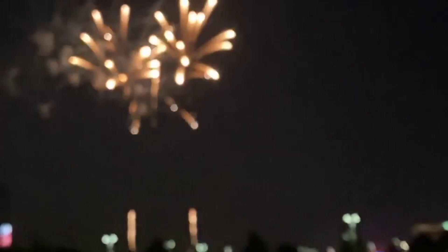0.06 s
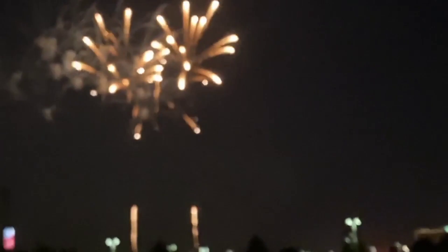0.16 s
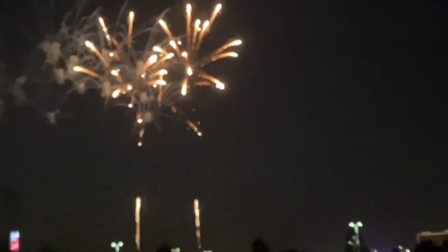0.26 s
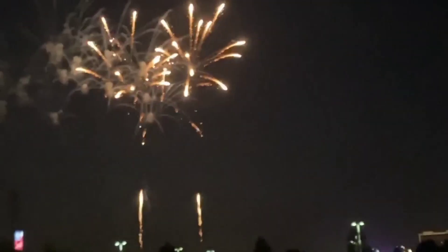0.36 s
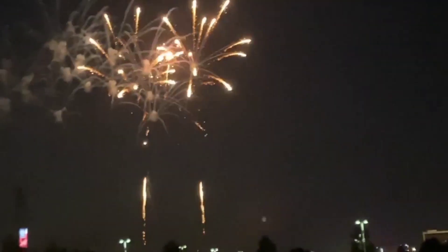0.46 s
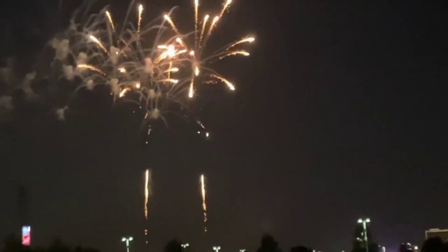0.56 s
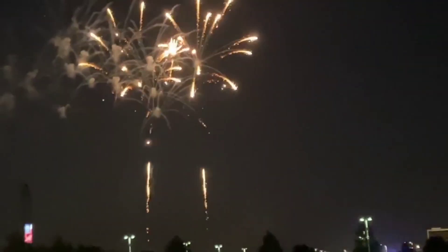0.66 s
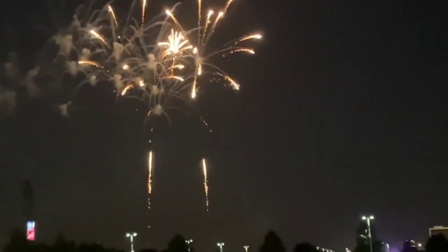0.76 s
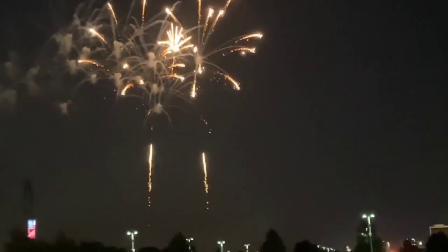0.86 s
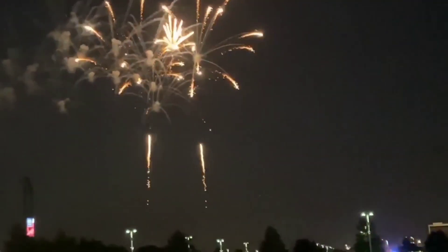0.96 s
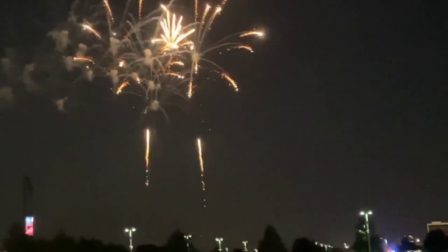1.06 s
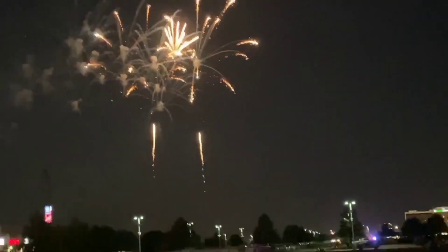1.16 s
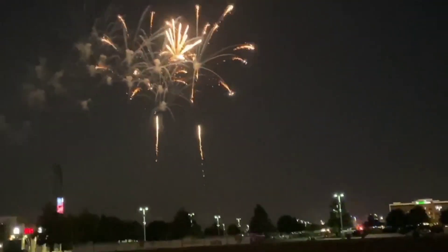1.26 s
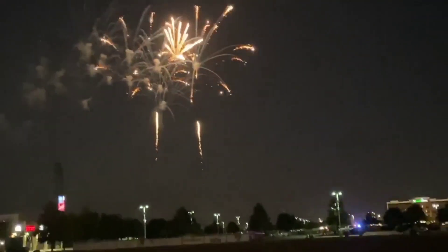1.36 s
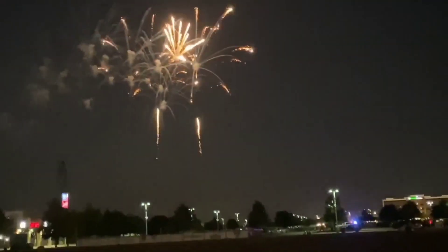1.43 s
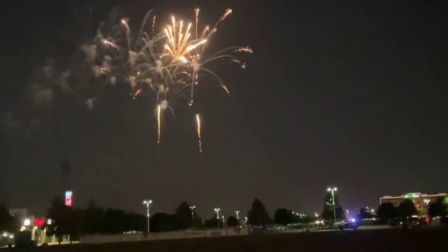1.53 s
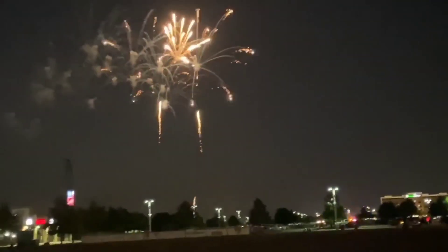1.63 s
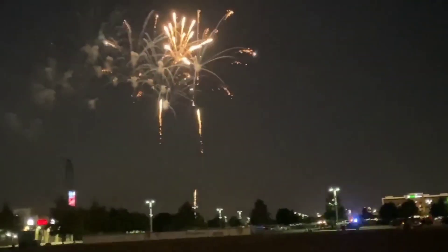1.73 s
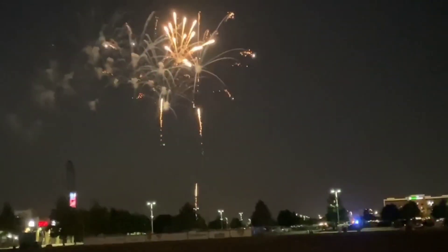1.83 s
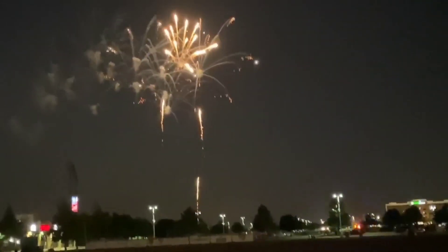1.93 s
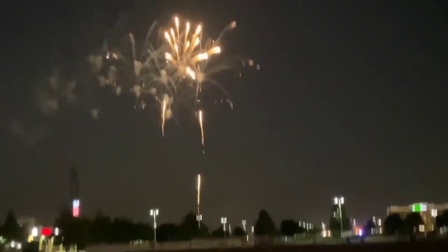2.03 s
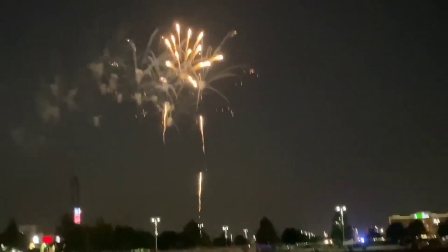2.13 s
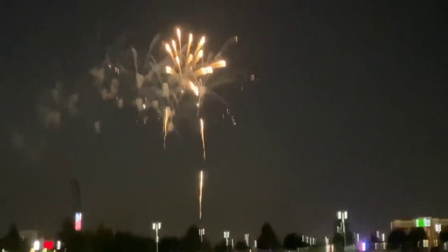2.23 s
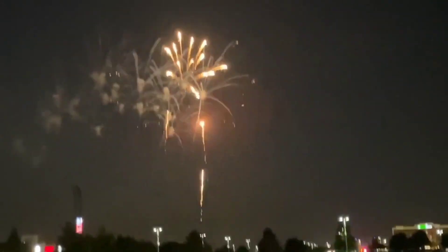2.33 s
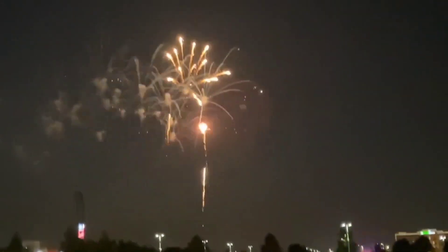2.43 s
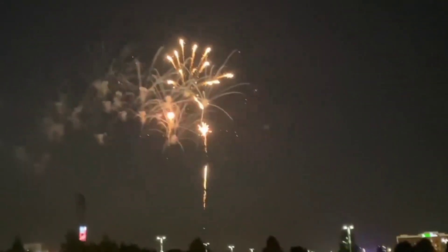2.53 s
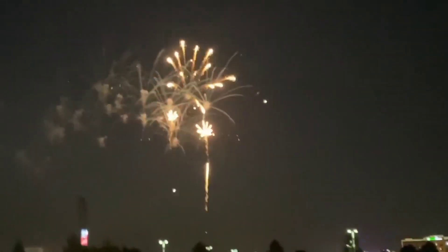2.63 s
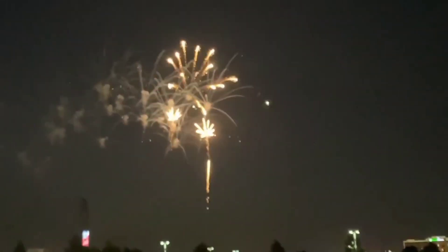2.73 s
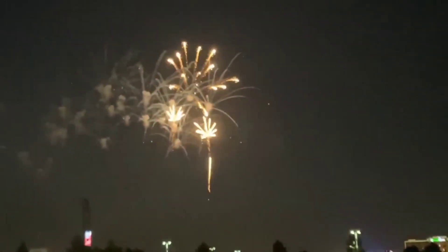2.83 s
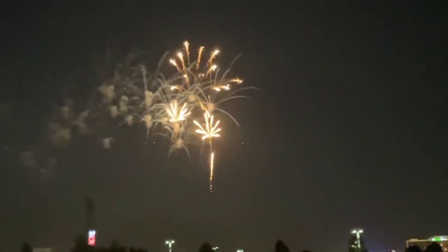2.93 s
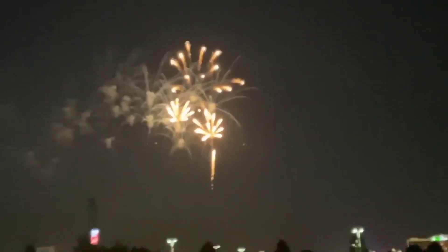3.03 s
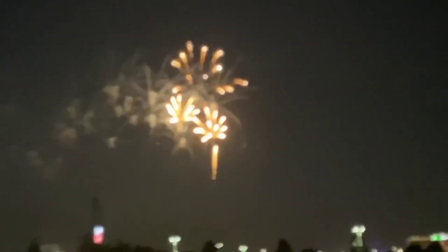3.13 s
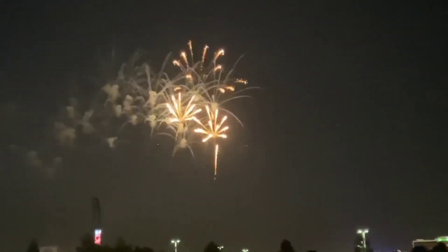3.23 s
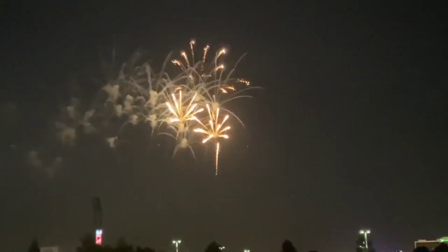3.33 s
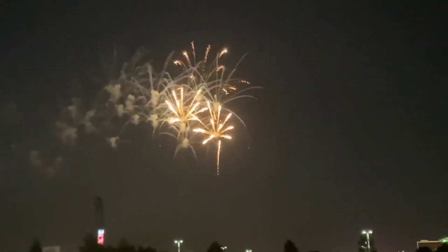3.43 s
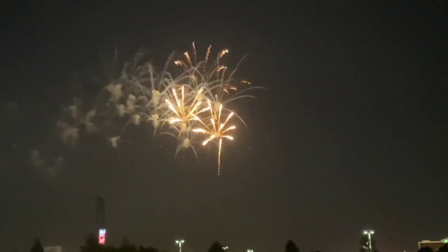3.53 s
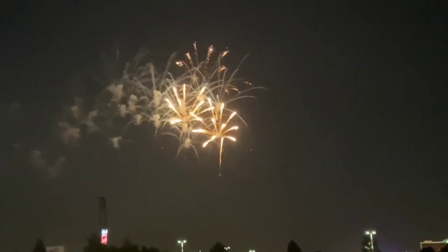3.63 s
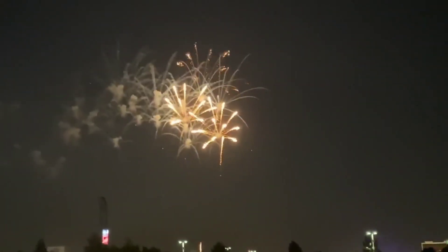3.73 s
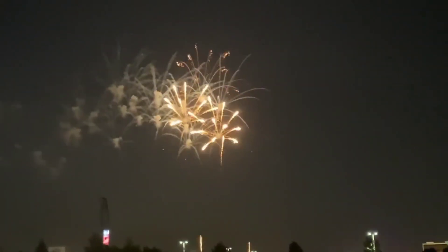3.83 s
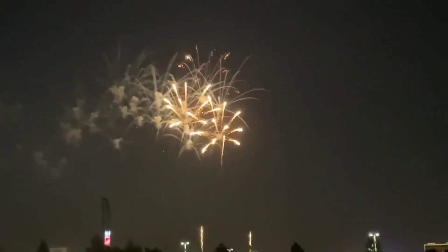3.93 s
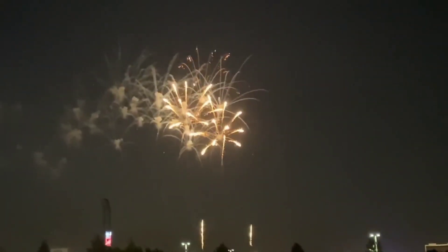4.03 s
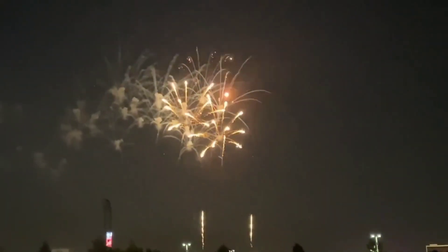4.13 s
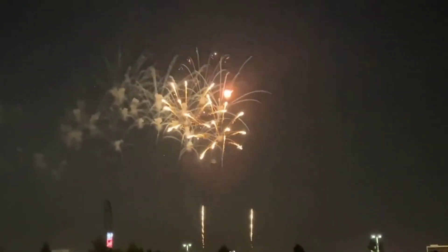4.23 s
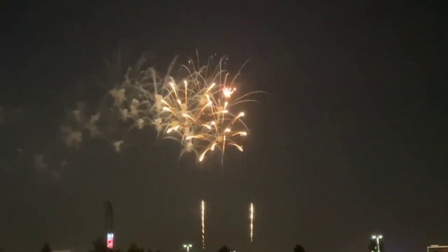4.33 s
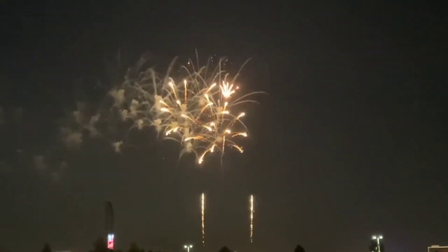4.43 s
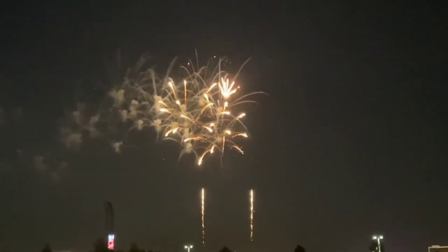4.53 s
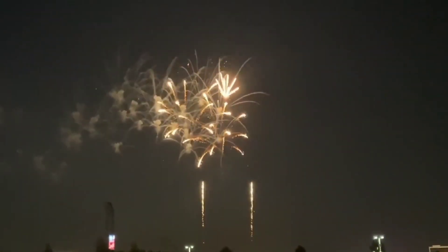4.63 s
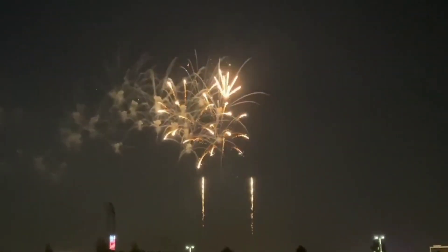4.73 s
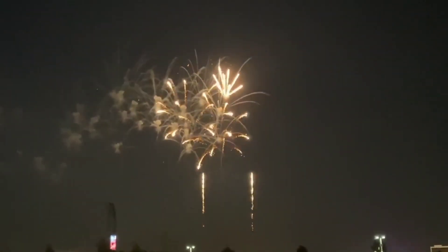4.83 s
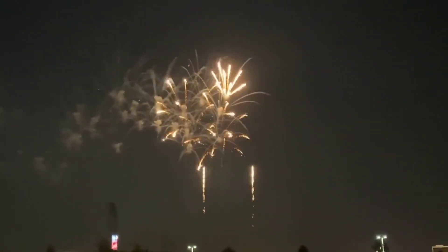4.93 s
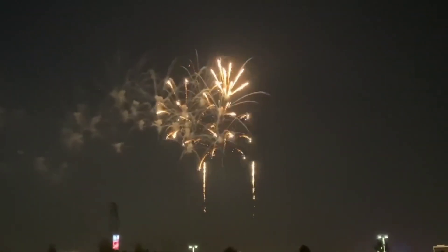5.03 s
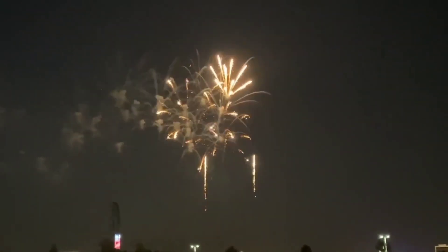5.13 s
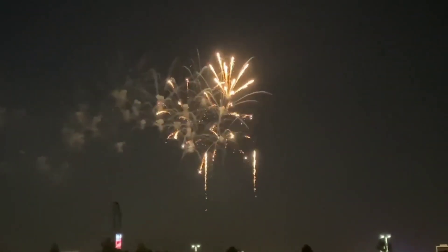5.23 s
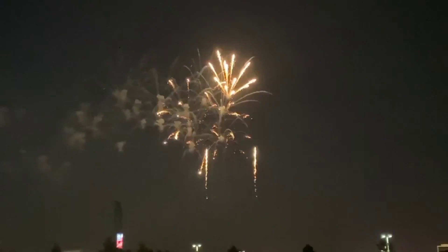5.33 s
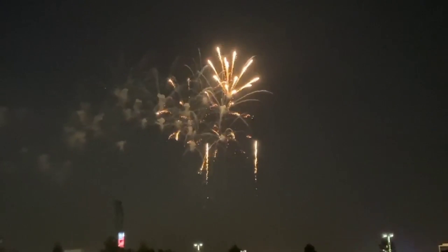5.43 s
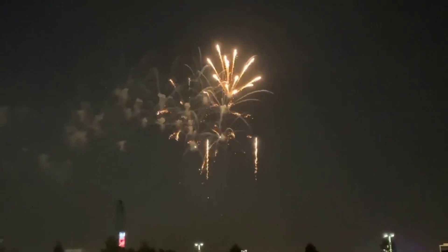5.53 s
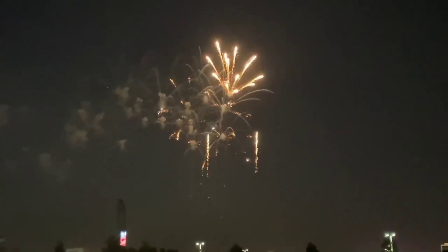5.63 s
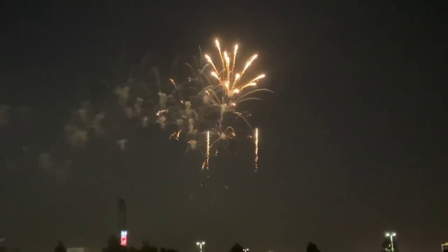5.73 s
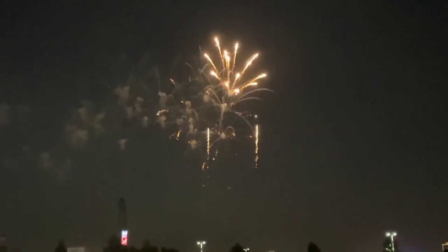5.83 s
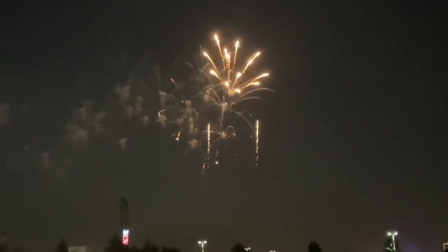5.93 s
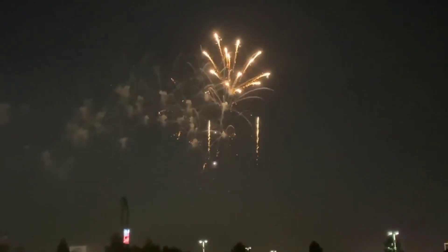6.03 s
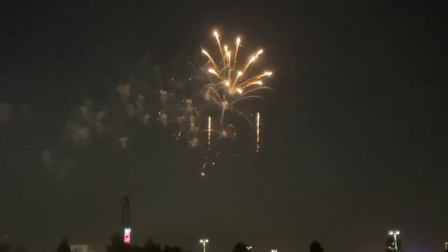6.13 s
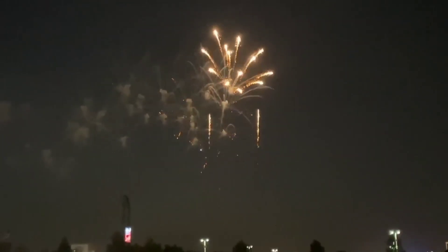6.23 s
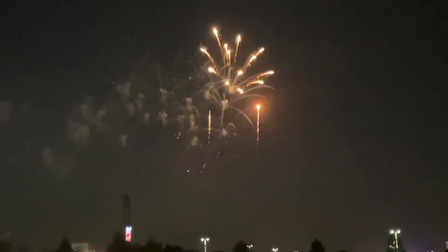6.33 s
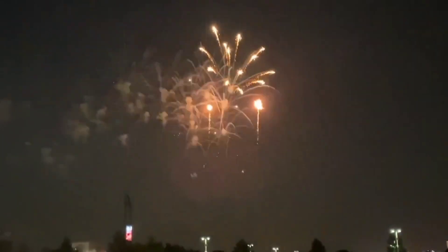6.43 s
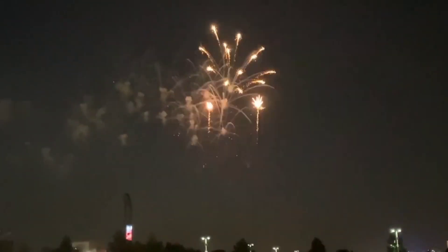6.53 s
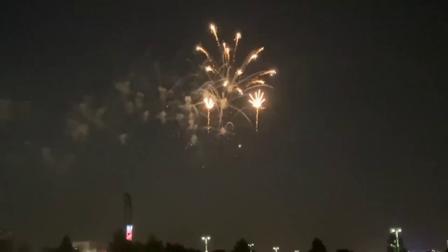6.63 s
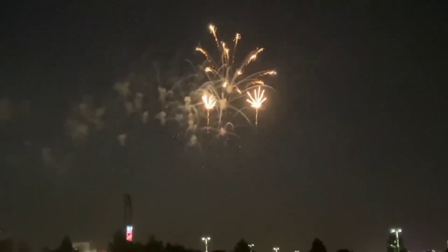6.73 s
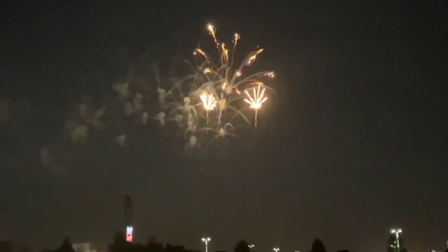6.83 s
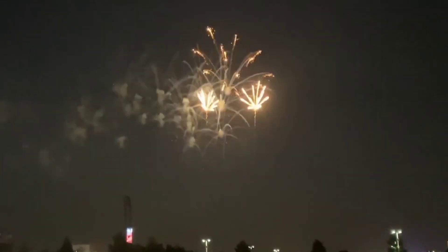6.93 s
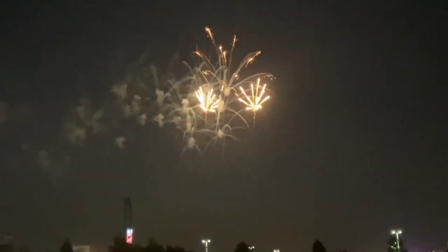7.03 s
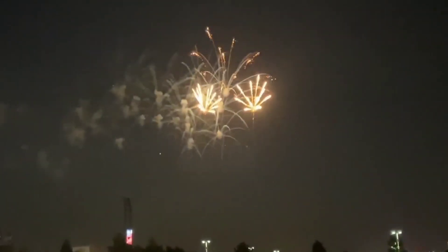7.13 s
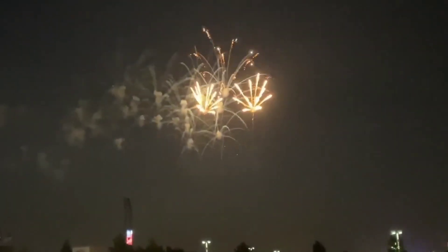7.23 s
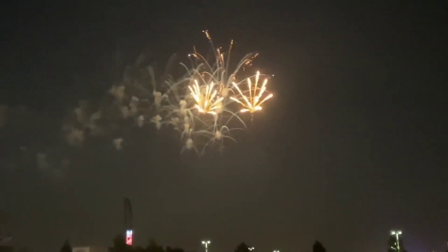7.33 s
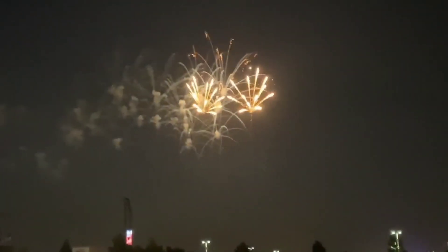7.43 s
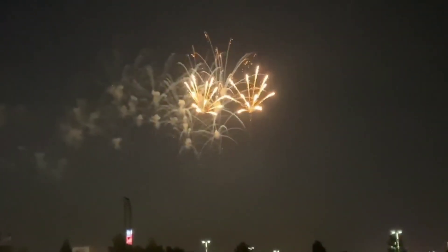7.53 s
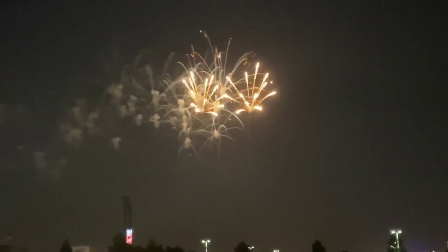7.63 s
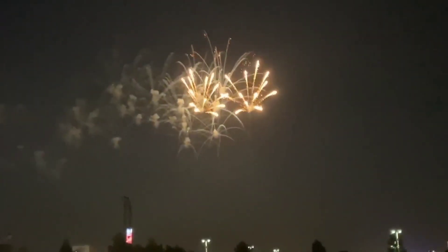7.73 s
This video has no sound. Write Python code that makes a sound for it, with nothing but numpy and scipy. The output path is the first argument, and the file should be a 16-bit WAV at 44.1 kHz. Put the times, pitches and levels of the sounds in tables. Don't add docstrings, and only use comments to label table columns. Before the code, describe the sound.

A steady, grainy hiss of burning sparks fills the night air while distant shells burst with hard cracks and rumbling echoes. Heavy muffled launch thumps fall between them, at times in clusters. The phone briefly dips the hiss after each blast. Toward the end the bangs stop, leaving brighter hiss, light pops, rumble and a tiny high insect note.

```python
import sys
import numpy as np
from scipy import signal
from scipy.fft import rfft, irfft
from scipy.io import wavfile
from scipy.ndimage import uniform_filter1d, minimum_filter1d

SR = 44100
rng = np.random.default_rng(int(sys.argv[2]) if len(sys.argv) > 2 else 0)


def wav_out(sig):
    wavfile.write(sys.argv[1], SR, np.round(np.clip(np.atleast_2d(sig).T, -1, 1) * 32767).astype(np.int16))


def field_ratio(decibels):
    return 10 ** (np.asarray(decibels, dtype=float) / 20)


N = 342216
TIME = np.arange(N) / SR
HZ = np.arange(N // 2 + 1) * SR / N

# f/Hz, level/dB
MICROPHONE_SPECTRUM = [(7000, -47), (7800, -3.5), (8800, 12), (10000, -15.5), (11500, -17), (12500, -21)]
# f/Hz, level/dB
STAR_SPECTRUM = [(410, -3.5), (700, -43), (954, 2), (1120, -15), (1290, -4), (1990, -2), (3510, -7),
                 (5750, -17), (7110, -26.5), (8090, -36), (9000, -83), (11700, -113), (19800, -120)]
# t/s, level/dB
STAR_BURNING = [(.1, -38), (.65, -38.5), (1.2, -34.3), (1.5, -36), (1.9, -34.5), (2.9, -35.3), (3.7, -37.5),
                (4.1, -35.8), (5.3, -35.8), (5.75, -35.5), (5.95, -38.5), (6.7, -33.8), (7.4, -32.5),
                (7.76, -33)]
# f/Hz, level/dB
TRAFFIC_SPECTRUM = [(130, -36), (220, -22.5), (261, -4.5), (298, -13), (356, 0.5), (719, -0.5), (958, -8),
                    (1130, -7), (1400, -10), (1820, -30.5), (3080, -120)]
# f/Hz, level/dB
ECHO_SPECTRUM = [(12, -68.5), (20, -21.5), (41, -11.5), (59, -2), (76, 1), (183, -4), (225, -9.5),
                 (253, -11), (303, -19), (350, -33), (460, -60), (770, -120)]
# t/s, length/s, f/Hz, level/dB
INSECT_BUZZES = [
    (.1, .7, 11000, -73),
    (1.08, .09, 10900, -75),
    (1.35, .18, 10900, -80),
    (3.08, .12, 11400, -76),
    (3, 1.6, 10700, -81),
    (5.1, 1.7, 10800, -83),
    (7.18, .14, 10600, -80),
]
# t/s, length/s, f/Hz, level/dB
INSECT_NOTES = [
    (6.885, .04, 9600, -74),
    (6.915, .05, 10600, -57),
    (6.96, .05, 9850, -70),
]
# t/s, peak level/dB, positive phase/ms, top f/Hz left by the air, ground echo delay/ms
SHELL_BURSTS = [
    (0.2614, 7.8, 1.14, 8000, 1.7),
    (0.4478, 7.2, 1.6, 9000, 6.5),
    (2.1808, 7.4, 1.09, 10000, 1.9),
    (4.0312, 7.4, 1.49, 7000, 6.1),
    (4.2574, 7.4, 1.39, 8000, 6.5),
    (5.8236, 6.4, 1.47, 8500, 5.8),
]
# t/s, peak level/dB, positive phase/ms, top f/Hz left by the ground, ground echo delay/ms
MORTAR_SHOTS = [
    (1.1596, 7.2, 1.78, 90, 12.0),
    (1.2427, 22.3, 0.4, 113, 1.1),
    (1.3319, -0.5, 0.65, 258, 9.6),
    (2.8591, -5, 1.77, 90, 11.4),
    (3.0515, 27, 0.4, 90, 12.2),
    (4.9248, 1.5, 0.52, 231, 4.3),
    (5.1388, 7, 0.4, 204, 4.8),
    (5.1616, 12.2, 2.13, 90, 4.7),
    (5.2195, 7.3, 1.84, 90, 11.9),
    (6.7117, -9.3, 3.51, 234, 4.2),
]
# t/s, peak level/dB, centre f/Hz, width/centre
CASING_CRACKS = [(.2606, -11, 2900, 1.6), (.4478, -13.5, 4100, 1.9), (1.1605, -19, 3800, .7),
                 (1.242, -18, 2460, .73), (2.173, -16, 1230, 1.3), (2.1808, -7, 6450, .42),
                 (3.0515, -18.5, 3000, .78), (3.053, -18, 800, 1.3), (4.0311, -15.5, 5800, .4),
                 (4.2574, -9.5, 4860, .43), (5.1535, -16, 3600, .4), (5.154, -7, 1466, .25),
                 (5.1545, -12, 3470, .14), (5.158, -16, 900, .6), (5.2222, -6, 2400, .6),
                 (5.2228, -11, 4500, 1.3), (5.2230, -11, 950, .8), (5.8234, -21, 4840, 1.7),
                 (6.050, -29, 6400, .28), (1.163, -24, 600, .9), (1.245, -20, 700, .9),
                 (5.157, -24, 6800, .3)]
# t/s, peak level/dB
STAR_POPS = [(0.5805, -16.5), (2.59, -21), (2.6374, -21), (3.1974, -19), (3.929, -16.5), (5.0245, -19),
             (5.3377, -15.5), (5.4111, -20), (5.7175, -19), (6.296, -19), (6.996, -14), (7.233, -15),
             (7.2952, -17), (7.455, -17), (7.635, -20)]
# f/Hz, level/dB
AIR_LOSS = [(180, 0.5), (290, -2), (540, 3.5), (1100, -3.3), (4000, -6.5), (6500, -8.5), (8500, -14.5),
            (10500, -10), (12500, -11.5), (14500, -63)]
# f/Hz, side minus mid level/dB
BED_WIDTH = [(40, -14.5), (110, -32.5), (200, -12), (360, -10), (650, -9), (1200, -3.5), (1900, -15),
             (3000, -8), (7000, -8)]
# f/Hz, level/dB
BODY_SHADE = [(150, -46.5), (400, -27.5), (900, -11), (1500, -18), (2500, -12), (6000, -16.5), (8500, -8),
              (11000, -11.5)]
# f/Hz, level/dB
PORT_DIFFERENCE = [(200, -6), (600, -8), (1300, -5), (2000, -11), (3500, -13), (6000, -24)]
# f/Hz, level/dB
PORT_AHEAD = [(4000, -26), (6500, -10), (8500, 6), (10500, -3), (13000, -3)]
# f/Hz, level/dB
GATE_MID = [(4500, -14), (6000, -7), (7200, -3), (8200, 3), (9200, 8), (10300, 3), (11800, 3), (12500, 12)]
# f/Hz, level/dB
GATE_SIDE = [(1750, -14), (2050, 11), (7400, 12), (7800, 0), (8800, -.5), (10000, 3), (11000, 8)]


def unit(x):
    return x / np.sqrt(np.mean(x ** 2))


def colour(x, points):
    hz, db = np.transpose(points)
    gain_db = np.interp(np.log(HZ + 1), np.log(hz), db)
    return irfft(rfft(x) * field_ratio(gain_db), N)


def analog(x, top, bottom, hz):
    scale = (1 / np.tan(np.pi * hz / SR)) ** np.array([2, 1, 0])
    return signal.lfilter(*signal.bilinear(top * scale, bottom * scale, fs=.5), x)


def low_pass(x, hz):
    return analog(x, [0, 0, 1], [1, 1.4, 1], hz)


def high_pass(x, hz, damping=1.4):
    return analog(x, [1, 0, 0], [1, damping, 1], hz)


def band_pass(x, hz, width):
    return analog(x, [0, width, 0], [1, width, 1], hz)


def walk(rate):
    k = int(SR / rate)
    held = np.repeat(rng.standard_normal(N // k + 1), k)
    return unit(uniform_filter1d(uniform_filter1d(held, k), k)[:N])


def add(track, s, piece):
    i = int(s * SR)
    track[i:i + len(piece)] += piece[:len(track) - i]


def impulses(rate, size_db):
    return (rng.random(N) < rate / SR) * field_ratio(size_db) * rng.choice([-1, 1], N)


def microphone_hiss(db):
    return field_ratio(db + 0.65 * walk(2)) * unit(colour(rng.standard_normal(N), MICROPHONE_SPECTRUM))


def stars():
    sparks = impulses(3000, 4.0 * np.minimum(rng.exponential(size=N), 4))
    flares = (rng.random(N) < 30 / SR) * rng.random(N)
    flares = 1 + .65 * signal.lfilter([1], [1, -np.exp(-1 / (0.008 * SR))], flares)
    mix = (unit(sparks) + 0.87 * rng.standard_normal(N)) * flares
    clumps_db = 0.5 * walk(30) + 0.27 * walk(6)
    return unit(colour(mix * field_ratio(clumps_db), STAR_SPECTRUM))


def burning_stars():
    hiss = stars()
    burning = field_ratio(np.interp(TIME, *np.transpose(STAR_BURNING)))
    lift = (burning / field_ratio(-36)) ** .55 - 1
    return burning * (hiss + lift * high_pass(hiss, 3000))


def traffic():
    return field_ratio(-39) * unit(colour(rng.standard_normal(N) * field_ratio(1.1 * walk(4.5)), TRAFFIC_SPECTRUM))


def roll(blast):
    rise_s, t60_s = .05, 5.5
    energy = high_pass(blast, 140) ** 2
    for s in (rise_s, t60_s / np.log(1e6)):
        energy = signal.lfilter([1], [1, -np.exp(-1 / (s * SR))], energy)
    earlier_shells = .45 * np.exp(-np.log(1e6) * TIME / t60_s)
    energy = energy / energy.max() + earlier_shells
    calm_db = -39
    return np.sqrt(field_ratio(2 * -27) * energy + field_ratio(2 * calm_db))


def rumble(gain):
    echoes = impulses(150, 1.5 * rng.exponential(size=N))
    echoes = unit(colour(unit(echoes) + rng.standard_normal(N), ECHO_SPECTRUM))
    rolling = colour(echoes, [(25, -9), (50, -5.5), (80, -5.5), (130, 1), (240, 2)])
    drone = colour(echoes, [(25, -48), (50, -36), (90, -36), (170, -55)])
    return gain * rolling + drone


def insect():
    out = np.zeros(N)
    buzz_hz, pure_hz = 1500, 90
    calls = [(0, N / SR, 10900, -85, buzz_hz)]
    calls += [(*call, buzz_hz) for call in INSECT_BUZZES]
    calls += [(*call, pure_hz) for call in INSECT_NOTES]
    for s, length, hz, db, width_hz in calls:
        call = rng.standard_normal(int(length * SR))
        for _ in range(2):
            call = band_pass(call, hz, width_hz / hz)
        add(out, s, field_ratio(db) * unit(call) * signal.windows.tukey(len(call), min(.3, .2 / length)))
    return out


def blasts():
    out, ms = np.zeros(N), np.arange(4096) * 1000 / SR
    rows = [(*row, .16) for row in SHELL_BURSTS] + [(*row, .78) for row in MORTAR_SHOTS]
    for s, db, push_ms, top_hz, echo_ms, share in rows:
        wave = field_ratio(db) * (1 - 1.18 * ms / push_ms) * np.exp(-ms / push_ms)
        wave = low_pass(low_pass(wave, top_hz), min(1.6 * top_hz, 11000))
        add(out, s, wave)
        add(out, s + echo_ms / 1000, share * low_pass(wave, 1800))
        for late, size in rng.random((3, 2)):
            add(out, s + 0.00017 + .0014 * late, 0.62 * (2 * size - 1) * high_pass(wave, 1300))
    deep = -.3 * band_pass(out, 30, .8)
    t = TIME[:8192]
    wash = rng.standard_normal(8192) * np.exp(-np.log(1000) * t / 0.25) * (t > .006)
    deep = deep + field_ratio(-40.5) * high_pass(signal.fftconvolve(out, wash)[:N], 110)
    return high_pass(out, 96, .46) + deep


def cracks(table):
    out, t = np.zeros(N), TIME[:3000]
    for s, db, hz, t60, width in table:
        decay = np.exp(-np.log(1000) * t / max(t60, .003))
        burst = rng.standard_normal(len(t)) * decay * np.minimum(t / .0012, 1)
        for _ in range(2):
            burst = band_pass(burst, hz, width)
        add(out, s, field_ratio(db) * burst / np.abs(burst).max())
    return out


def casings():
    ringing = cracks([(s, db, hz, .013 - .0015 * (db + 7), width) for s, db, hz, width in CASING_CRACKS])
    return colour(ringing, [(8000, 0), (10500, -14)])


def star_pops():
    pops = cracks([(s, db, 2150, .035, .75) for s, db in STAR_POPS])
    return colour(colour(pops, [(5500, -1), (9000, -33)]), AIR_LOSS)


def scene():
    blast = blasts()
    gain = roll(blast)
    mid, side = [burning_stars() + rumble(gain) + traffic() for _ in range(2)]
    mid = mid + star_pops() + insect()
    side = colour(side, BED_WIDTH) + microphone_hiss(-74) + colour(mid, BODY_SHADE)
    shots = colour(blast + casings(), AIR_LOSS)
    side = side + colour(high_pass(shots, 680, 1.2), PORT_DIFFERENCE)
    side = side + colour(np.gradient(shots), PORT_AHEAD)
    mid = mid + shots + microphone_hiss(-82)
    side = side - 0.083 * low_pass(mid, 250)
    return np.array([mid + side, mid - side])


def duck_db(x, over_db=-7, most_db=8, hold_s=.098, release_s=.065):
    peak_db = 20 * np.log10(np.abs(x).max(axis=0) + 1e-9)
    cut = -np.clip(peak_db - over_db, 0, most_db)
    hold, release = int(hold_s * SR), int(release_s * SR)
    cut = minimum_filter1d(cut, hold, origin=(hold - 1) // 2)
    slow = uniform_filter1d(cut, release, origin=(release - 1) // 2)
    return np.roll(uniform_filter1d(np.minimum(cut, slow), size=256), 330)


def spectral_gate(x, excess, bins=8):
    z = signal.stft(x, nperseg=2048)[2]
    tiles = z[:-1].reshape(-1, bins, z.shape[1])
    db = 10 * np.log10(np.mean(np.abs(tiles) ** 2, axis=1) + 1e-20)
    over = db - np.median(db, axis=1, keepdims=True)
    over = over - np.minimum(np.median(over, axis=0), 0) + 3 * rng.standard_normal(db.shape)
    centre_hz = (np.arange(len(db)) + .5) * bins * SR / 2048
    need = np.interp(centre_hz, *np.transpose(excess), left=-99)
    is_open = over > need[:, None]
    z[:-1] = (tiles * is_open[:, None]).reshape(-1, z.shape[1])
    return signal.istft(z, nperseg=2048)[1][:N]


def top_cut(x):
    return signal.sosfilt(signal.butter(12, 13160, fs=SR, output="sos"), x)


def record(dry):
    low = low_pass(dry, 280)
    top = band_pass(dry, 7000, 1.2)
    cut_db = duck_db(high_pass(dry, 900))
    x = low * field_ratio(0.12 * cut_db) + (dry - low - top) * field_ratio(cut_db) + top * field_ratio(0.76 * cut_db)
    q = .8
    for split_hz in (162, 332, 680):
        x = analog(x, [1, -1 / q, 1], [1, 1 / q, 1], split_hz)
    x = np.roll(x, 20, axis=1)
    x = x / (1 + x ** 6) ** (1 / 6)
    x = x * (TIME > .098)
    mid = analog((x[0] + x[1]) / 2, [1, .02, 1], [1, .11, 1], 9100)
    mid = spectral_gate(mid, GATE_MID)
    side = spectral_gate((x[0] - x[1]) / 2, GATE_SIDE)
    return top_cut(np.array([mid + side, mid - side]))


dry = scene()
out = record(dry)
wav_out(out)
```